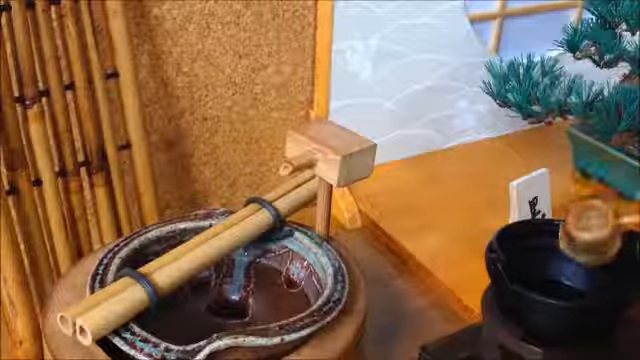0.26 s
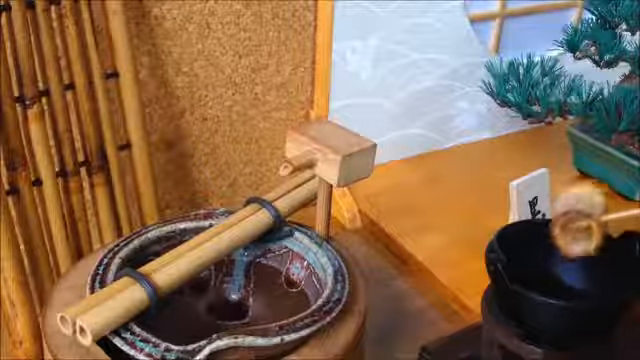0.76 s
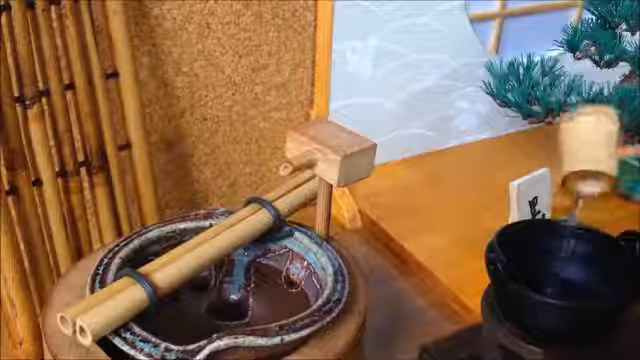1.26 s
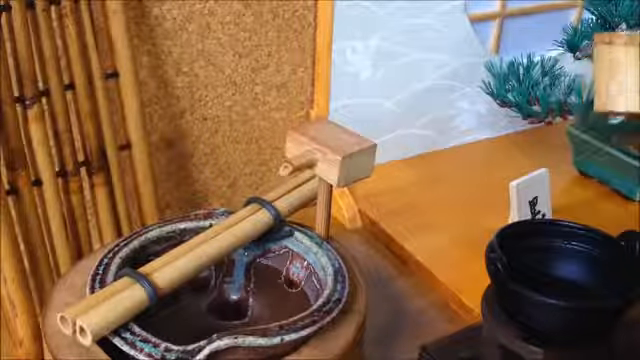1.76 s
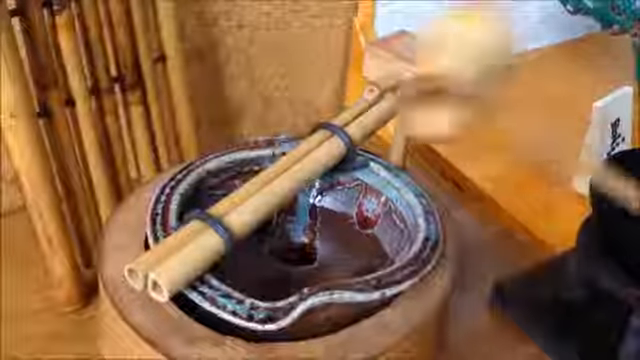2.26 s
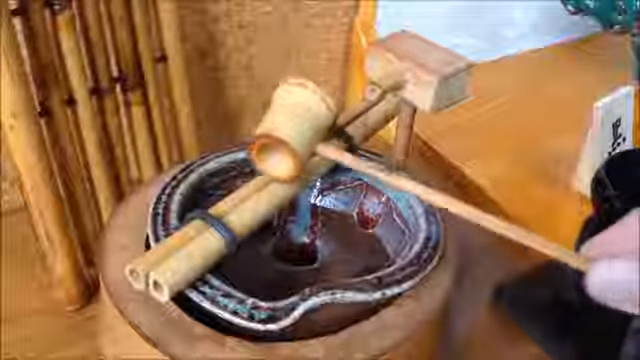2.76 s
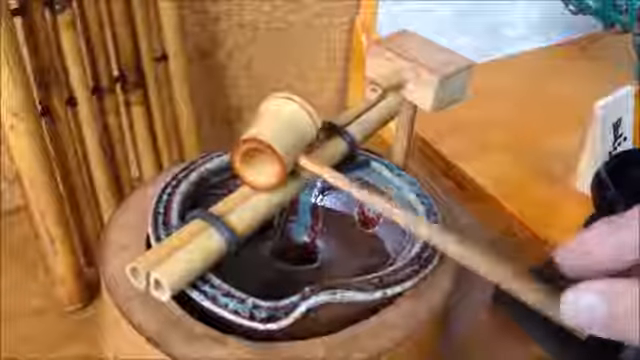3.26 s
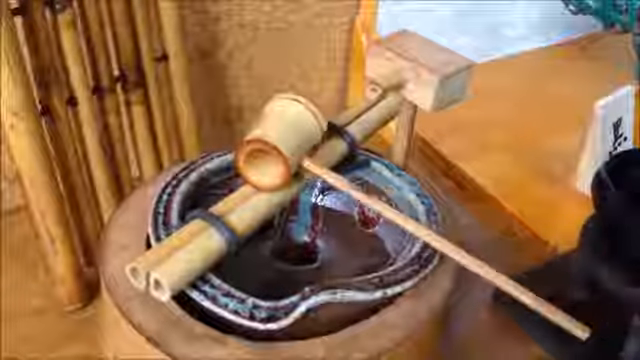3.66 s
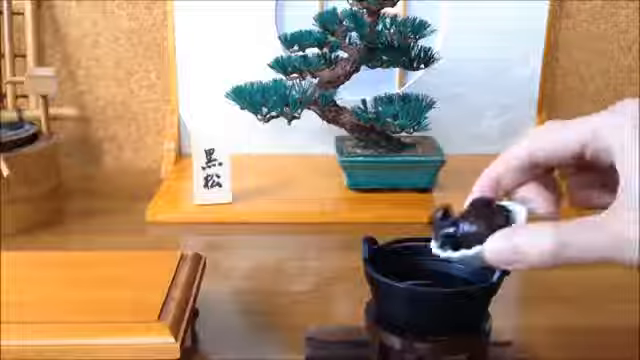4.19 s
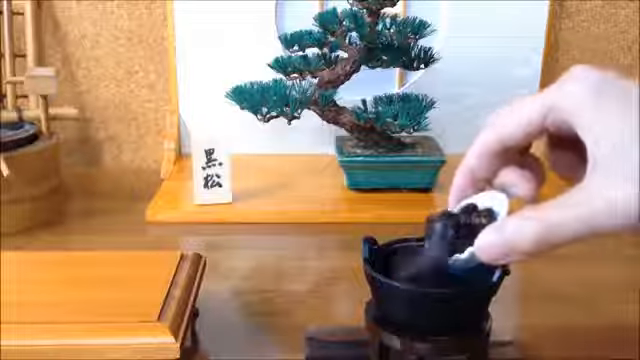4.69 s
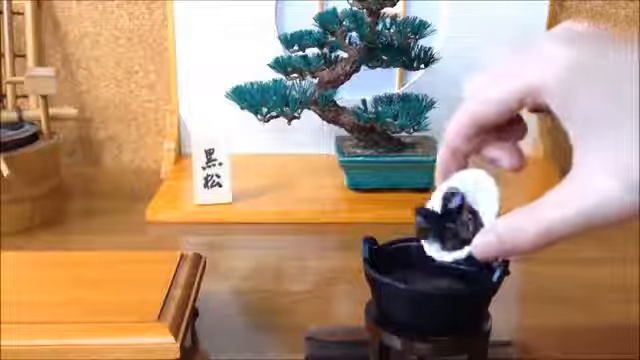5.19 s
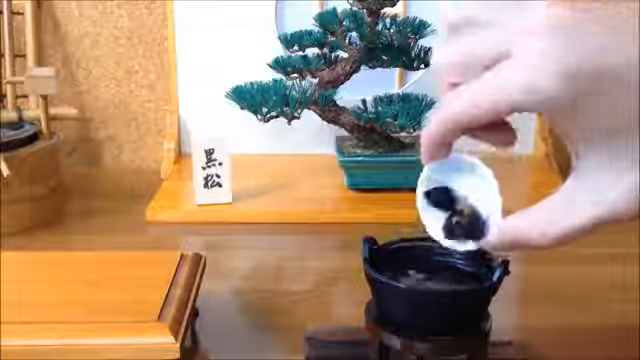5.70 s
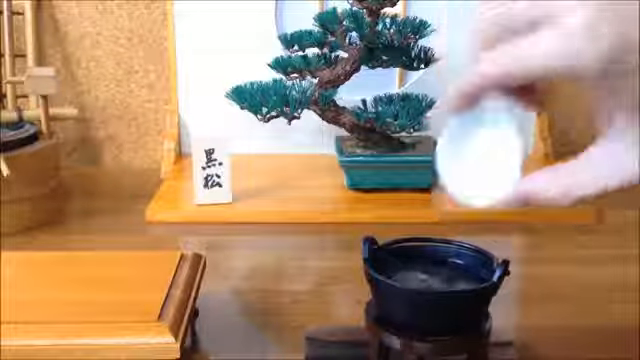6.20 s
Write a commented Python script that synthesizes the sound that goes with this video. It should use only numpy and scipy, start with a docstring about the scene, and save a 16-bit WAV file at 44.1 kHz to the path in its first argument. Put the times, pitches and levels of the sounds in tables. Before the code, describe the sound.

Soft bamboo knocks and one small water blip over faint hiss, followed by bright ceramic tinks and tiny shells clattering into a ringing little iron pot.

```python
"""Miniature cooking on a wooden table

Hiss, mains hum and an appliance's whine (shaped noise and sines) fill a small room.
A bamboo ladle bumps an iron pot, sheds a drop (rising sines) and bounces onto a bamboo rest.
Then tiny clams tinkle off a ceramic dish, strike the iron and settle in a heap.
Solid impacts are coloured contact pulses plus damped modes, each with a short room answer."""
import sys
import numpy as np
from scipy import signal
from scipy.fft import rfft, irfft, next_fast_len
from scipy.io import wavfile
from scipy.ndimage import uniform_filter1d, map_coordinates

SR = 44100
rng = np.random.default_rng(int(sys.argv[2]) if len(sys.argv) > 2 else 0)


def materialize(psi):
    """Save the field psi as 16-bit PCM at rate SR to the path in sys.argv[1].

    A 1-D psi becomes a single channel; in a 2-D psi each row is a channel.
    """
    bounded = np.clip(np.atleast_2d(psi).T, -1, 1)
    quanta = np.round(bounded * 32767).astype(np.int16)
    wavfile.write(sys.argv[1], SR, quanta)


N = 284084
T = np.arange(int(0.6 * SR)) / SR  # time axis of one event (s)

# contact colour of a clam shell: freq_hz, level_db
SHELL_COLOUR = [(300, -25), (1300, -16), (2200, -1), (3000, 9), (4200, -2), (5300, 0), (6300, -2),
                (7700, 0), (9000, -4), (11000, 0), (15000, -4)]


def amp(db):
    """Decibels to gain."""
    return 10 ** (np.asarray(db) / 20)


def unit(x):
    """Scale to rms 1."""
    return x / np.sqrt(np.mean(x ** 2) + 1e-20)


def blow(x):
    """Scale to the energy of one millisecond at rms 1."""
    energy_ms = np.sum(x ** 2) * 1000 / SR
    return x / np.sqrt(energy_ms + 1e-20)


def fade(t60, t=T):
    """Exponential decay, 60 dB down at t60 seconds."""
    return amp(-60 * t / t60)


def along(points, hz):
    """Interpolate (Hz, value) points on a log frequency axis."""
    f, v = np.transpose(points)
    return np.interp(np.log(hz + 1), np.log(f + 1), v)


def wobble(knots_per_s):
    """Smooth random curve through normally distributed knots."""
    knots = rng.standard_normal(400)
    return map_coordinates(knots, [np.arange(N) * knots_per_s / SR], mode="mirror")


def filtered(x, response):
    """Multiply the spectrum of x by a function of frequency."""
    size = next_fast_len(len(x) + 8192)
    spectrum = rfft(x, size) * response(np.fft.rfftfreq(size, 1 / SR))
    return irfft(spectrum, size)[:len(x)]


def soften(x, cutoff_hz, order=2):
    """Lowpass: a softer contact lasts longer and excites less treble."""
    cutoff_hz = min(cutoff_hz, SR / 2 - 1000)
    return signal.sosfilt(signal.butter(order, cutoff_hz, fs=SR, output="sos"), x)


def contact(colour, t60, scatter_db, size=2048):
    """One sharp push and a dense, fast-dying ring, both in the colour of the body."""
    magnitude = amp(along(colour, np.fft.rfftfreq(size, 1 / SR)))
    # folding the cepstrum makes the body minimum phase: its energy comes first
    cepstrum = irfft(np.log(magnitude))
    causal = (np.arange(size) < size // 2) * (np.arange(size) > 0)
    body = irfft(np.exp(rfft(2 * cepstrum * causal)))
    push = blow(1.0 * (T == 0))
    scatter = blow(rng.standard_normal(len(T)) * fade(t60))
    return blow(signal.fftconvolve(push + amp(scatter_db) * scatter, body)[:len(T)])


def ring(modes, pitch=1):
    """Sum of damped modes, at slightly new random strengths for each impact."""
    strengths = amp(1.2 * rng.standard_normal(len(modes)))
    total = 0
    for strength, (hz, db, t60) in zip(strengths, modes):
        total = total + strength * amp(db) * fade(t60) * np.sin(2 * np.pi * hz * pitch * T)
    return total


def add(track, s, sound, room_db):
    """Place a sound with the room's short answer: noise whose decay time depends on frequency."""
    # room decay: freq_hz, t60_s
    room_decay = [(150, 0.38), (500, 0.22), (3000, 0.18), (8000, 0.15), (12000, 0.071)]
    build_s = 0.0049  # reflections build up: t60 of the missing part
    hz, t, z = signal.stft(rng.standard_normal(SR // 4), SR, nperseg=256)
    decay = fade(along(room_decay, hz)[:, None], t)
    tail = signal.istft(z * decay, SR, nperseg=256)[1]
    tail = tail * (1 - fade(build_s)[:len(tail)])
    answer = signal.fftconvolve(sound, tail / np.linalg.norm(tail))[:len(sound)]
    wet = sound + amp(room_db) * answer
    start = round(s * SR)
    track[start:start + len(wet)] += wet[:N - start]


def background():
    """Shaped-noise hiss, slightly unsteady mains-hum sines and an appliance's whine as noise bands."""
    # hiss spectrum before scaling: freq_hz, density_db
    hiss_shape = [(15, -49), (25, -30), (69, -4), (106, -10.5), (176, -4), (237, -11), (301, -10.5),
                  (450, -20.5), (604, -21.5), (691, -25.5), (1420, -25.5), (1860, -22.5), (2130, -25),
                  (3350, -25.5), (15000, -29.5)]
    # hum partials: freq_hz, peak_db
    hum_partials = [(120, -62), (180, -59.5), (300, -73), (600, -82.5)]
    # whine of the appliance's casing: centre_hz, width_hz, before_db, after_db (rms)
    whine_bands = [(1633, 34, -80, -82.5), (1747, 32, -83.5, -76.5), (1839, 57, -79.5, -76),
                   (3500, 1100, -76.5, -76)]
    hiss_db = -62  # rms
    step_s = 3.9  # the whine levels step
    t = np.arange(N) / SR
    hiss = amp(hiss_db) * unit(filtered(rng.standard_normal(N), lambda f: amp(along(hiss_shape, f))))
    hum = np.zeros(N)
    for hz, db in hum_partials:
        level = amp(db + 1.6 * wobble(15))
        phase = 2 * np.pi * (hz * t + rng.random()) + 0.052 * wobble(2.7)
        hum += level * np.sin(phase)
    whine = np.zeros(N)
    for hz, width_hz, before_db, after_db in whine_bands:
        band = filtered(rng.standard_normal(N), lambda f: 1 / (1 + ((f - hz) / width_hz * 2) ** 2))
        whine += amp(np.where(t < step_s, before_db, after_db)) * unit(band)
    return hiss + hum + whine


def iron(cutoff_hz, low_db, high_db=0, pitch=1, damping=1):
    """Damped modes of the iron pot; the point of impact sets the share of low and high modes."""
    # pot modes: freq_hz, level_db, t60_s
    pot_modes = [(2046, -11.5, .42), (2060, -17, .2), (2239, -15, .22), (2632, -18, .1), (5222, 0, .23),
                 (5593, -16, .13), (9400, -2, .045), (10900, -16, .08), (14700, -3, .025)]
    modes = []
    for hz, level_db, t60 in pot_modes:
        share_db = low_db * (hz < 4400) + high_db * (hz > 9000)
        modes.append((hz, level_db + share_db, t60 / damping))
    return soften(ring(modes, pitch), cutoff_hz)


def bamboo(colour, modes, db, cutoff_hz, ring_db):
    """A knock, the struck part's ring and a buzz of loosely tied canes; low bending waves lag."""
    bend_lag_s = 0.00159  # lag at f is this * (sqrt(1000 / f) - 1/4)
    knock = blow(soften(contact(colour, t60=0.005, scatter_db=12), cutoff_hz, order=3))
    ringing = blow(soften(ring(modes), cutoff_hz))
    canes = blow(soften(contact(colour, t60=0.06, scatter_db=33), min(cutoff_hz, 5500), order=3))
    sound = amp(db) * knock + amp(ring_db) * (ringing + amp(-5.0) * canes)
    return filtered(sound, lambda f: np.exp(-4j * np.pi * bend_lag_s * (np.sqrt(1000 * f) - f / 8)))


def ladle():
    """The cup bumps the pot and rings its iron; later the cup drops on its rest, the handle on the table."""
    # bumps on the pot: start_s, knock_db, iron_ring_db, low_modes_db
    bumps = [(0.6459, -35, -53, 5.5), (0.7635, -47, -58, -4)]
    # bump colour: freq_hz, level_db
    bump_colour = [(40, -19), (130, -6), (180, 8), (250, 2), (420, -10), (650, -8), (850, 0), (1130, 5),
                   (1350, -6), (1650, -5), (2100, -7), (2800, -17), (4500, -27), (8000, -38)]
    # cup on its rest, with bounces: start_s, knock_db, cutoff_hz, ring_db, pitch_ratio
    cup_knocks = [(3.0561, -33, 1900, -39.5, 1.04), (3.0602, -46, 4500, -34, 1.01),
                  (3.222, -24, 14000, -28, 0.99), (3.239, -34, 6500, -33, 1),
                  (3.2465, -45, 2500, -41.5, 0.98)]
    # cup modes: freq_hz, level_db, t60_s
    cup_modes = [(300, -5, .08), (472, 7, .065), (520, 4, .035), (740, -8, .05), (1245, 5, .055),
                 (1335, 5, .045), (1846, -2, .06), (2060, -3, .045), (2191, -3, .06), (2466, -3, .06),
                 (3284, -3, .05), (5230, -5, .035)]
    # cup contact colour: freq_hz, level_db
    cup_colour = [(40, -38), (150, -7), (300, -5), (385, -8), (480, 4), (620, -10), (770, -2), (960, -18.5),
                  (1330, 5), (1800, -3), (2300, 0), (2700, -7.5), (3250, 1), (3900, -6.5), (5000, -11),
                  (5800, -19), (7800, -31), (9400, -13), (10700, -35), (13000, -26), (15000, -46)]
    # handle on the table, with bounces: start_s, knock_db, cutoff_hz, ring_db
    handle_knocks = [(3.5099, -21.5, 15000, -28.5), (3.5229, -39, 3500, -34), (3.541, -32.5, 6000, -35.5),
                     (3.5572, -44.5, 4460, -43), (3.561, -42.5, 1190, -50)]
    # handle modes: freq_hz, level_db, t60_s
    handle_modes = [(295, -6, .05), (460, 2, .06), (720, -1, .04), (1210, 2, .05), (1390, 2, .05),
                    (2713, -3, .05), (3176, 2, .04), (4650, 1, .04), (5227, 6, .04), (7700, 0, .04),
                    (12100, -7, .04)]
    # handle contact colour: freq_hz, level_db
    handle_colour = [(40, -38), (150, -6), (300, -6), (385, -5), (470, -6), (740, -0.5), (950, -9),
                     (1320, 1), (2020, -11.5), (2700, -6), (3150, 2), (3900, -2), (4700, 1), (5300, -2.5),
                     (5900, -16), (6800, -21), (7640, 1.5), (8500, -16), (9270, -10), (10100, -23),
                     (12100, -4.5), (13200, -18), (15000, -30)]
    out = np.zeros(N)
    for s, db, iron_db, low_db in bumps:
        add(out, s, amp(db) * contact(bump_colour, t60=0.019, scatter_db=0), room_db=-13.5)
        ringing = iron(5240, low_db, pitch=1.008)  # rings a little higher before it is filled
        add(out, s, amp(iron_db) * ringing, room_db=-6)
    for s, db, cutoff_hz, ring_db, pitch in cup_knocks:
        modes = [(hz * pitch, level_db, t60) for hz, level_db, t60 in cup_modes]
        add(out, s, bamboo(cup_colour, modes, db, cutoff_hz, ring_db), room_db=-15.5)
    for s, db, cutoff_hz, ring_db in handle_knocks:
        add(out, s, bamboo(handle_colour, handle_modes, db, cutoff_hz, ring_db), room_db=-13)
    return out


def drip():
    """A drop traps brief bubbles: decaying sines whose pitch climbs as they near the surface."""
    # bubbles: start_s, level_db, start_hz, end_hz, life_s
    bubbles = [(1.4295, -65, 10200, 10400, .012), (1.4358, -40.5, 2240, 2370, 0.0042),
               (1.4383, -38, 2300, 3330, 0.0051)]
    t60_lives = 2.8  # decay t60 in bubble lives
    out = np.zeros(N)
    for s, db, start_hz, end_hz, life_s in bubbles:
        hz = np.interp(T, [0, life_s], [start_hz, end_hz])
        decay = fade(t60_lives * life_s, np.maximum(T - life_s / 2, 0))
        swell = (1 - fade(0.0023)) * decay
        add(out, s, amp(db) * swell * np.sin(2 * np.pi * np.cumsum(hz) / SR), room_db=-13.5)
    return out


def clam(db, cutoff_hz, pitch, thud_db):
    """A clam's click, with a brief shell ring in its own pitch and colour, and a low thump."""
    # shell modes: freq_hz, level_db, t60_s
    valve_modes = [(2810, 3, 0.027), (3360, -4, 0.014), (4180, -11, 0.01), (7560, 12, 0.02),
                   (9500, 10, 0.029)]
    # thump colour: freq_hz, level_db
    thud_colour = [(25, -42), (70, -6), (140, 3), (230, -4.5), (370, 2.5), (490, 5), (640, 1), (740, 2),
                   (920, 2), (1300, -5.5), (1750, -7), (2200, -36), (3000, -15), (8000, -30)]
    spread_db = 2.2  # colour differs from shell to shell
    pitch = np.clip(pitch, 0.5, 2.2)
    valve = blow(ring(valve_modes, pitch))
    colour = [(hz * pitch, level_db + spread_db * rng.standard_normal()) for hz, level_db in SHELL_COLOUR]
    snap = contact(colour, t60=0.0045, scatter_db=3)
    click = blow(soften(snap + amp(-18) * valve, cutoff_hz))
    return amp(db) * click + amp(thud_db) * contact(thud_colour, t60=0.026, scatter_db=12.5)


def clams():
    """Clams on iron ring it, lower and shorter as it fills, and rock its stand; lighter clacks do not."""
    # strikes on iron: start_s, click_db, cutoff_hz, shell_pitch_ratio (before clip), thud_db,
    # edge_crack_db, iron_ring_db, low_modes_db, high_modes_db, fill (0-1)
    landings = [(4.8113, -25, 10100, 1.06, -44, -38.5, -44.5, -8, 6, 0),
                (4.9127, -43, 9000, 1, -38, -55, -64, -6, 17, 0.1),
                (5.0499, -28.5, 11980, 1, -48, -25, -47, 9.5, -1, 0.05),
                (5.5701, -33.5, 5700, 1.03, -36, -52, -49, -8, -5, 0.48),
                (5.9925, -28.5, 11200, 1.32, -36, -39, -46.5, -4, 7, 0.74),
                (6.0342, -32, 5970, 0.79, -38.5, -46, -42.5, -2, -2, 1)]
    # lighter clacks, shells against each other and the dish touching the pot's rim:
    # start_s, click_db, cutoff_hz, pitch_ratio (before clip), thud_db
    clacks = [(4.374, -51.5, 6000, 1.84, -46), (4.725, -54, 900, 1.8, -46), (4.775, -59, 4000, 1.2, -48),
              (4.8077, -39, 8000, 1.1, -60), (4.8531, -31.5, 6000, 0.98, -47),
              (4.8613, -35.5, 5000, 1.05, -46), (4.879, -41, 8000, 1.3, -56),
              (4.9098, -35.5, 3500, 0.98, -44), (4.9285, -55, 6000, 1.4, -53),
              (4.934, -37.5, 5000, 0.93, -49), (4.9363, -45, 12000, 1, -56),
              (4.9553, -38.5, 3700, 0.96, -62), (4.9728, -41, 9000, 0.89, -49),
              (4.9812, -45, 5500, 1.7, -51), (5.012, -45.5, 5500, 0.79, -57),
              (5.0726, -41.5, 9000, 0.8, -58), (5.1225, -43, 7000, 2.2, -55), (5.611, -46.5, 4530, 1, -54),
              (5.8145, -50.5, 3800, 1.03, -58), (5.9694, -52, 7000, 1.5, -57),
              (6.0042, -38.5, 4200, 0.86, -44), (6.0067, -35, 10000, 1.2, -45),
              (6.0093, -32.5, 12000, 2.5, -42), (6.0127, -36, 14000, 1.8, -48),
              (6.015, -35, 12000, 0.89, -45), (6.042, -31.5, 6400, 0.89, -41.5),
              (6.1372, -54, 4500, 0.77, -51), (6.1502, -52, 4000, 1.08, -53.5)]
    # colour of the iron edge's crack: freq_hz, level_db
    edge_colour = [(500, -44), (2500, -9), (4600, -10), (5600, 9), (6300, -12), (7500, 4), (9600, -12),
                   (11000, 9.5), (12300, -5), (13500, -10), (15000, -15)]
    # stand mode: freq_hz, level_db, t60_s
    stand_modes = [(147.7, -16, 0.31)]
    fill_sag, fill_damping = 0.0105, 0.87  # full pot: share of pitch lost, extra damping
    out = np.zeros(N)
    for s, db, cutoff_hz, pitch, thud_db, edge_db, iron_db, low_db, high_db, fill in landings:
        edge = amp(edge_db) * contact(edge_colour, t60=0.0095, scatter_db=5)
        add(out, s, clam(db, cutoff_hz, pitch, thud_db) + edge, room_db=-11.5)
        iron_pitch = 1 - fill_sag * fill
        damping = 1 + fill_damping * fill ** 2
        ringing = iron(14000, low_db, high_db, iron_pitch, damping)
        add(out, s, amp(iron_db) * ringing + amp(thud_db) * ring(stand_modes), room_db=-13)
    for s, db, cutoff_hz, pitch, thud_db in clacks:
        add(out, s, clam(db, cutoff_hz, pitch, thud_db), room_db=-8.5)
    return out


def dish():
    """Shells click on the dish; fingers and resting shells shift and damp its high ring from tap to tap."""
    # taps: start_s, ring_db, crack_re_ring_db, shell_click_db, ring_hz, t60_s
    tinks = [(4.7593, -36, -3, -52, 7560, 0.016), (4.7731, -26, -6, -61, 7740, 0.01),
             (4.7758, -32, -4, -60, 8100, 0.014), (4.794, -42, -3, -47, 7900, .015),
             (4.8398, -34, -18, -51, 7900, .008), (4.864, -36, -9, -55, 7800, 0.011),
             (4.872, -42, -8, -54, 7900, .02), (4.8805, -36.5, -10, -55, 7870, .025),
             (4.8874, -32.5, -9, -51, 7750, 0.024), (4.8975, -43, -14, -63, 7900, 0.025),
             (5.4083, -38, 3.5, -62, 7350, 0.011), (5.412, -53, -10, -47, 7700, .015),
             (5.456, -36.5, -13, -51, 7720, 0.015), (5.4596, -50, -4, -47, 7800, .02),
             (5.5028, -64, 4, -54, 7700, .015), (5.5267, -40, -7, -39, 7480, 0.01),
             (5.9065, -20, -5, -64, 7820, .014), (5.941, -24, -2.5, -46, 7700, 0.02)]
    # dish modes: ratio_to_ring_hz, level_db, share_of_t60
    dish_modes = [(1, 13, 0.97), (1.1, -13, 0.91), (.965, -34, 0.8)]
    # colour of the dish's crack: freq_hz, level_db
    chip_colour = [(500, -45), (2000, -22), (3200, -10), (5300, -6), (6600, 0), (7800, 8), (8800, 2),
                   (10200, -5), (12500, -7), (15000, -6)]
    # harder taps crack brighter: ring_db, cutoff_hz
    crack_cutoffs = [(-39, 7800), (-24, 14700)]
    rise_s = 0.00055  # ring builds up: t60 of the missing part
    out = np.zeros(N)
    for s, db, crack_db, shell_db, ring_hz, t60 in tinks:
        modes = [(ring_hz * ratio, level_db, t60 * share) for ratio, level_db, share in dish_modes]
        tink = blow((1 - fade(rise_s)) * ring(modes))
        crack_hz = np.interp(db, *np.transpose(crack_cutoffs))
        crack = blow(soften(contact(chip_colour, t60=0.004, scatter_db=10), crack_hz))
        click = blow(soften(contact(SHELL_COLOUR, t60=0.0038, scatter_db=10), 6600))
        add(out, s, amp(db) * (tink + amp(crack_db) * crack) + amp(shell_db) * click, room_db=-14.5)
    return out


def slipping(pitch):
    """The ribs of one sliding shell catch at random, each catch a tiny click."""
    slips_per_s, spread_db = 90, 6
    sizes = rng.choice([-1, 1], len(T)) * amp(spread_db * rng.standard_normal(len(T)))
    slips = sizes * (rng.random(len(T)) < slips_per_s / SR)
    shell = contact([(hz * pitch, level_db) for hz, level_db in SHELL_COLOUR], t60=0.004, scatter_db=2)
    return signal.fftconvolve(slips, shell)[:len(T)]


def tumbles():
    """The heap settles: ribbed shells slide in tiny slips, with small knocks at uneven intervals."""
    # tumbles: start_s, length_s, scrape_db, knocks_db, cutoff_hz
    settlings = [(4.826, 0.059, -55, -52, 8000), (4.905, 0.098, -62, -56, 8000),
                 (5.07, 0.019, -66, -52, 7080), (6.007, 0.015, -49, -52, 13000),
                 (6.044, 0.017, -53, -48, 3500)]
    # pitch ratios of the sliding shells
    sliding_pitches = [.95, 1.02, 1.1]
    attack_s, t60_s = 0.0033, 0.08  # shells start sliding, come to rest
    knocks_per_s, knock_spread_db, thud_re_knock_db = 75, 6, -9
    out = np.zeros(N)
    for start, length, scrape_db, knock_db, cutoff_hz in settlings:
        grit = unit(soften(sum(slipping(pitch) for pitch in sliding_pitches), cutoff_hz))
        envelope = np.minimum(T / attack_s, 1) * fade(t60_s, np.maximum(T - length, 0))
        add(out, start, amp(scrape_db) * envelope * grit, room_db=-19)
        count = int(np.ceil(length * knocks_per_s))
        for k in range(count):
            db = knock_db + knock_spread_db * rng.standard_normal()
            s = start + length * (k + rng.random()) / count
            pitch = np.exp(0.08 * rng.standard_normal())
            add(out, s, clam(db, cutoff_hz, pitch, db + thud_re_knock_db), room_db=-11)
    return out


def dull_clunks():
    """One clam drops to the bottom of the pot and rocks there: low-coloured contacts."""
    # clunks: start_s, level_db
    clunks = [(5.0159, -29.5), (5.0181, -33)]
    # pot bottom colour: freq_hz, level_db
    bottom_colour = [(30, -40), (130, 5), (190, -12), (280, -10), (430, 1), (640, 5), (740, -3), (900, 2.5),
                     (1170, -8.5), (1400, 1.5), (1700, 0), (2100, -12), (3200, -12), (4500, -24),
                     (12000, -36)]
    out = np.zeros(N)
    for s, db in clunks:
        add(out, s, amp(db) * contact(bottom_colour, t60=0.0068, scatter_db=7), room_db=-9)
    return out


def scene():
    """Sum of all layers, mono."""
    impacts = ladle() + drip() + clams() + dish() + tumbles() + dull_clunks()
    return (background() + impacts)[None]


def record(dry):
    """The level dips once, briefly; a steep lowpass limits the band."""
    dip_start_s, dip_end_s, dip_db, top_hz = 2.1545, 2.181, -22, 15300
    t = np.arange(N) / SR
    dip = uniform_filter1d(1.0 * ((t > dip_start_s) & (t < dip_end_s)), size=130)
    return filtered(dry[0] * amp(dip_db * dip), lambda f: 1 / np.sqrt(1 + (f / top_hz) ** 140))[None]


dry = scene()
out = record(dry)
materialize(out)
```